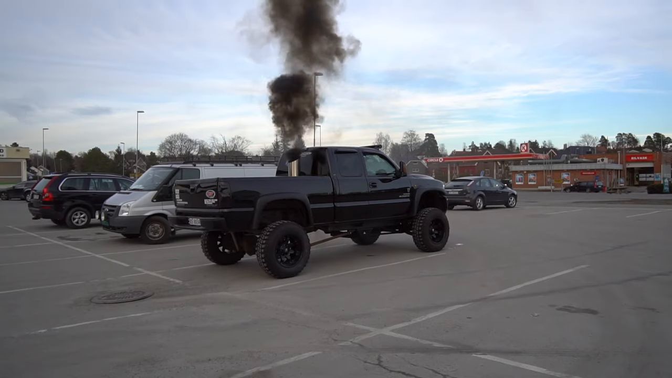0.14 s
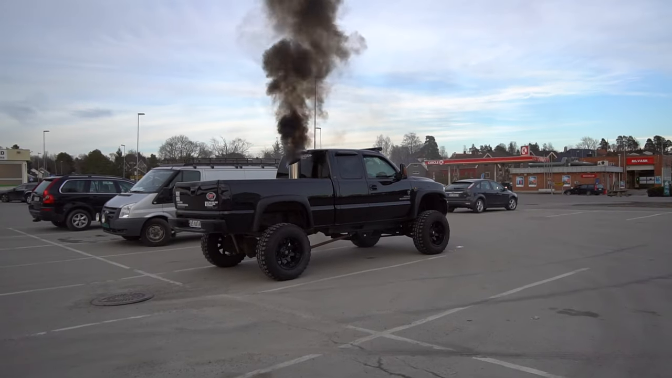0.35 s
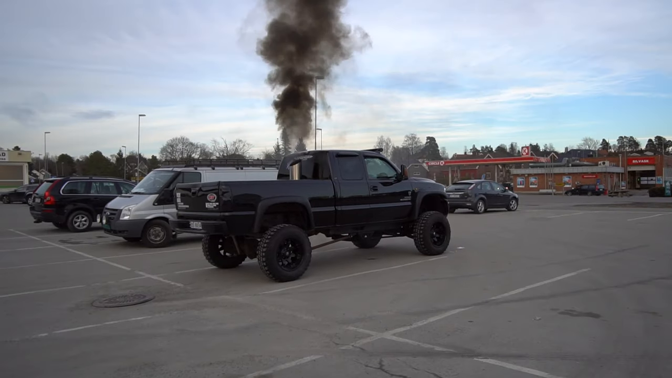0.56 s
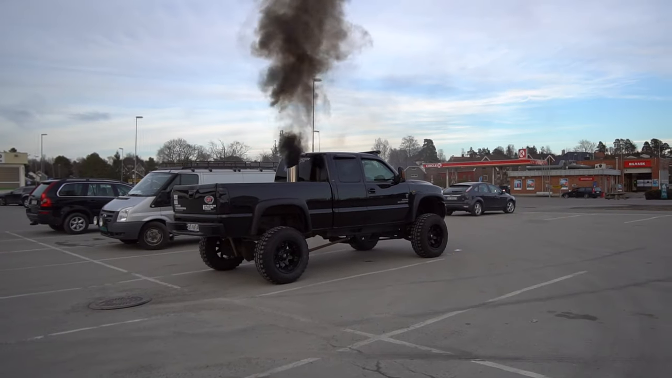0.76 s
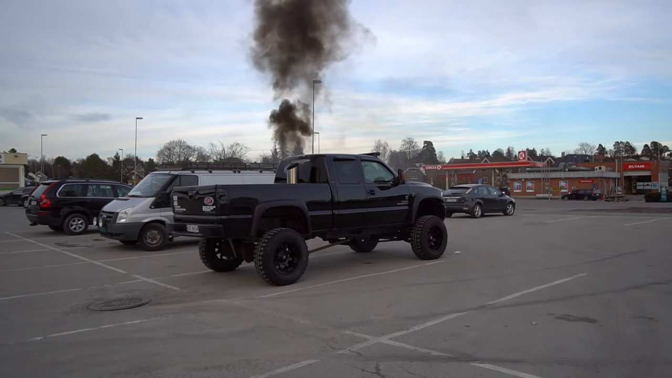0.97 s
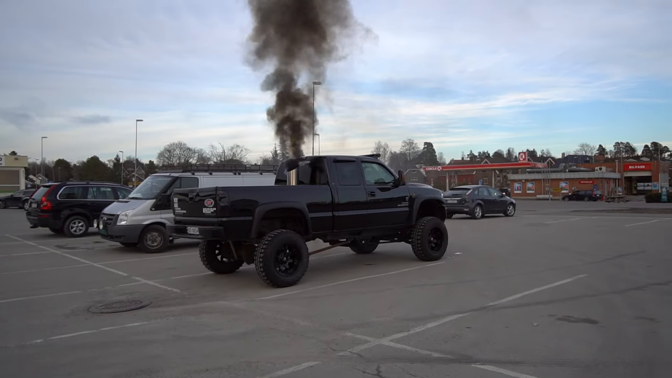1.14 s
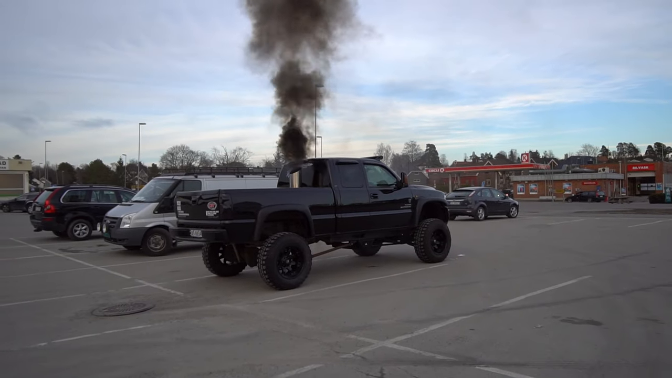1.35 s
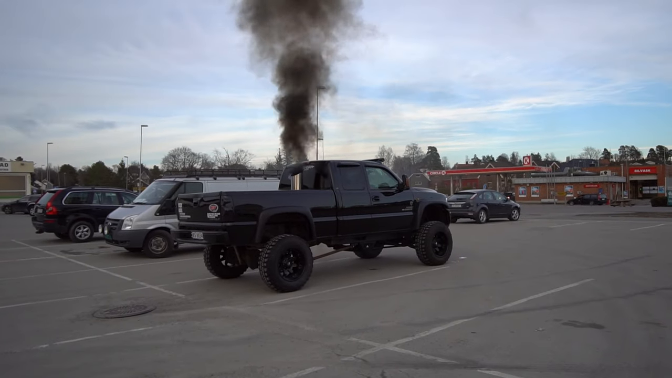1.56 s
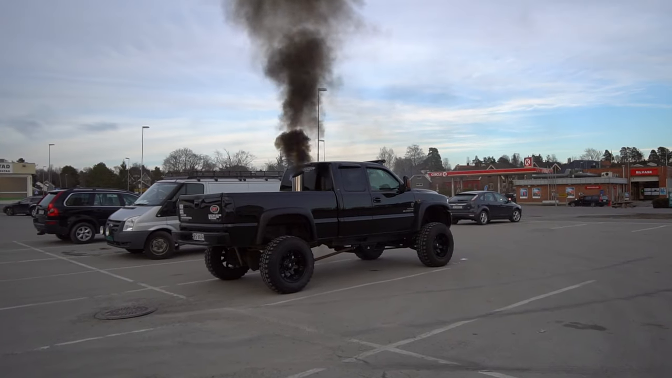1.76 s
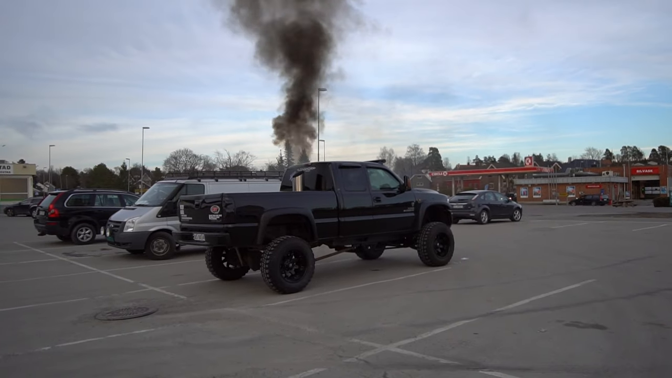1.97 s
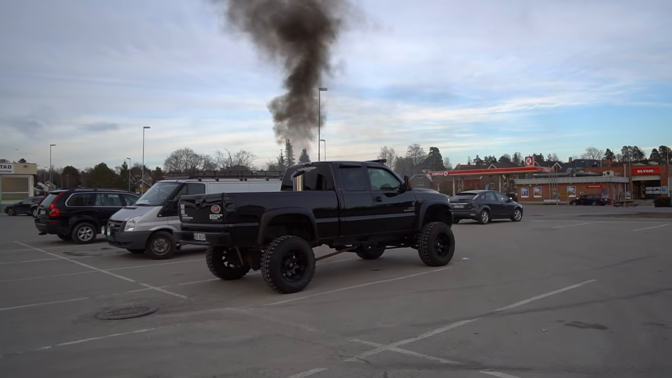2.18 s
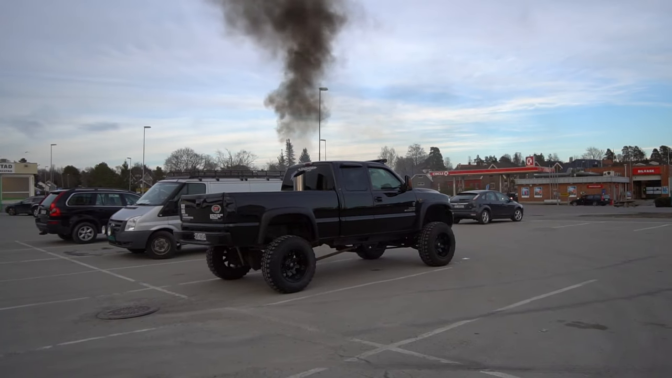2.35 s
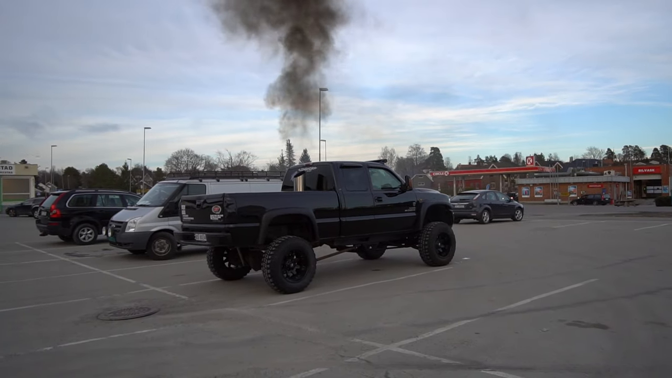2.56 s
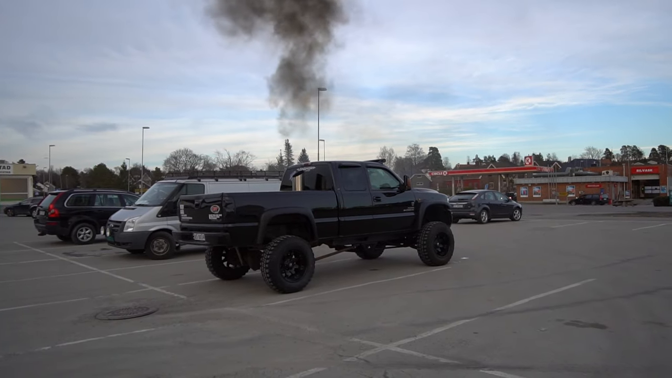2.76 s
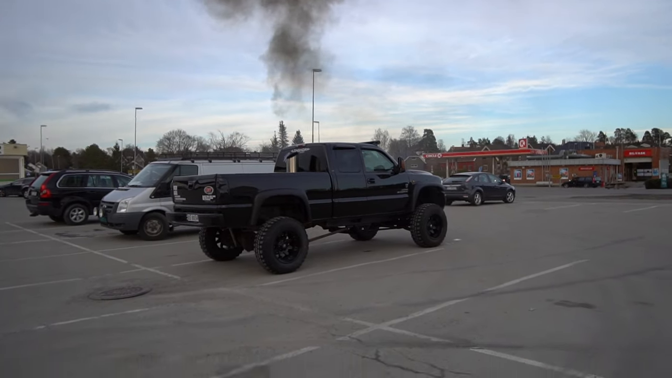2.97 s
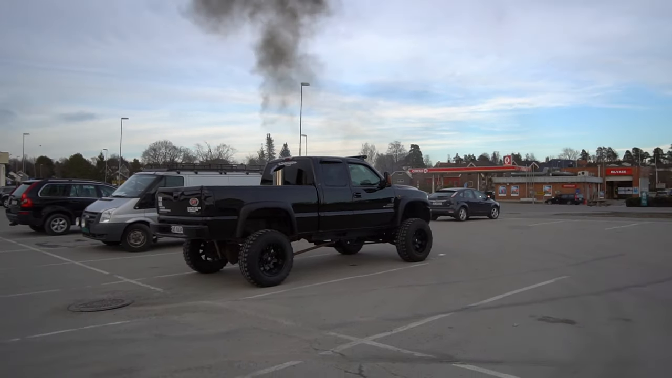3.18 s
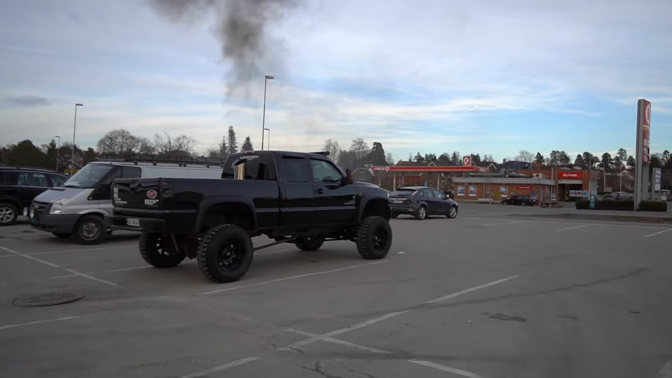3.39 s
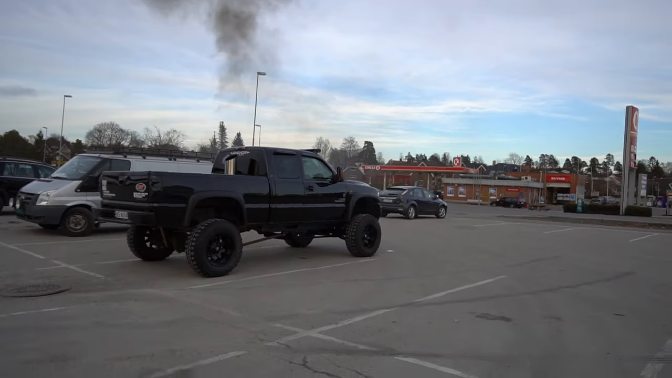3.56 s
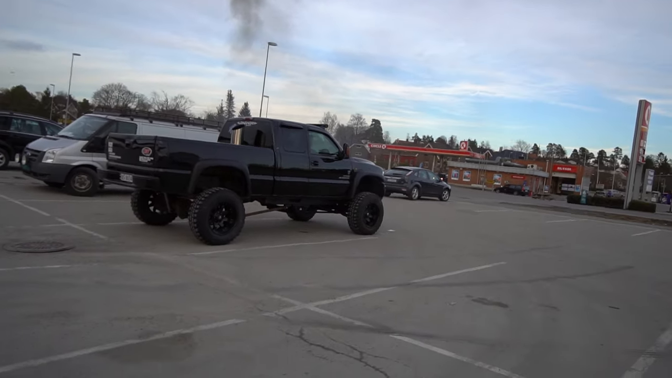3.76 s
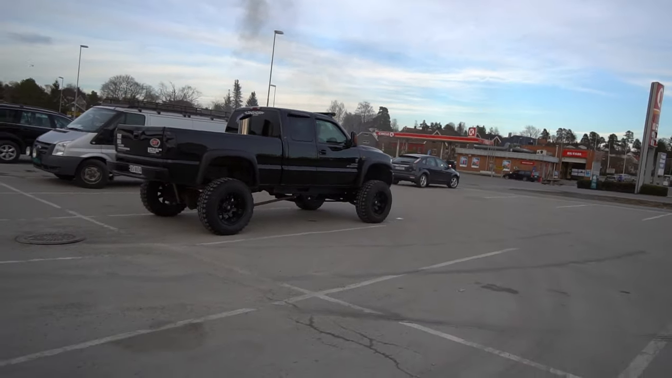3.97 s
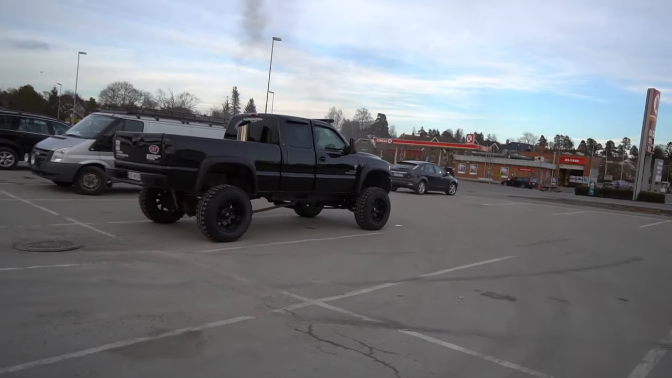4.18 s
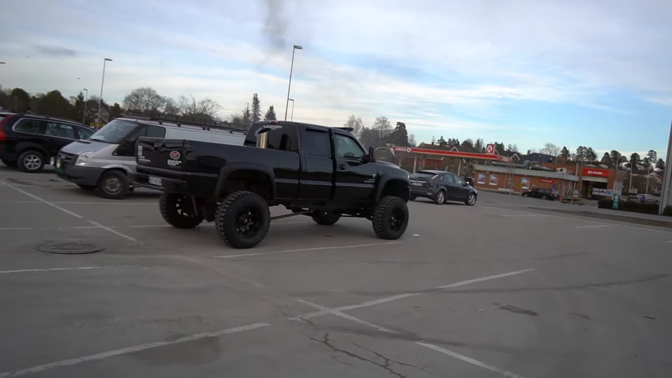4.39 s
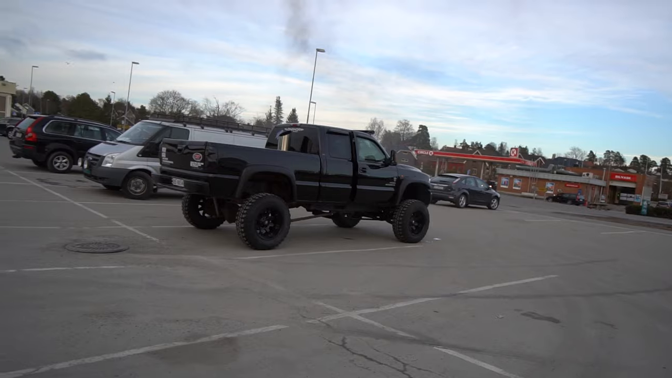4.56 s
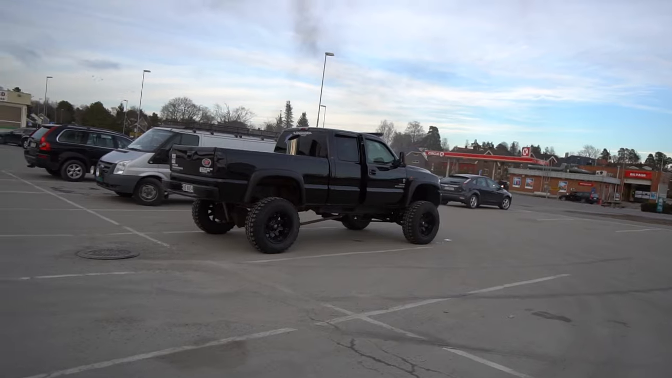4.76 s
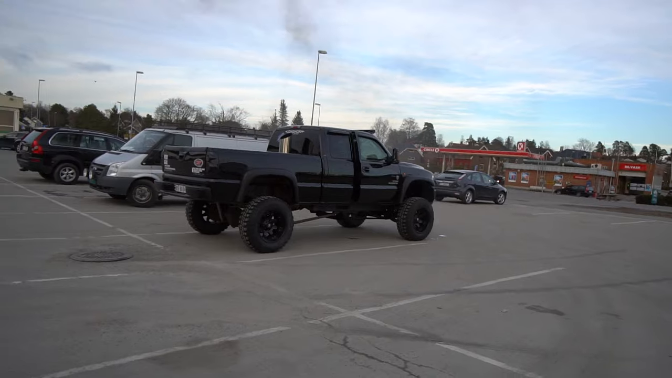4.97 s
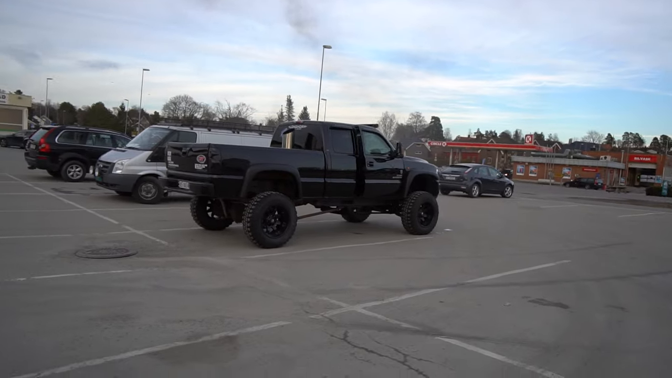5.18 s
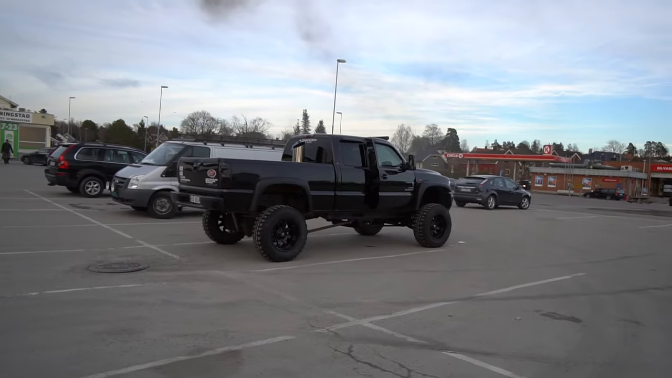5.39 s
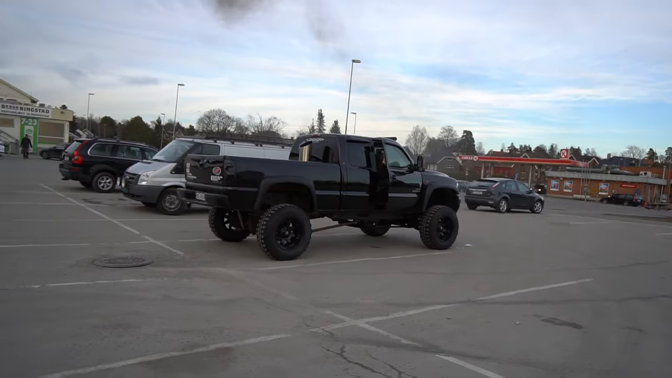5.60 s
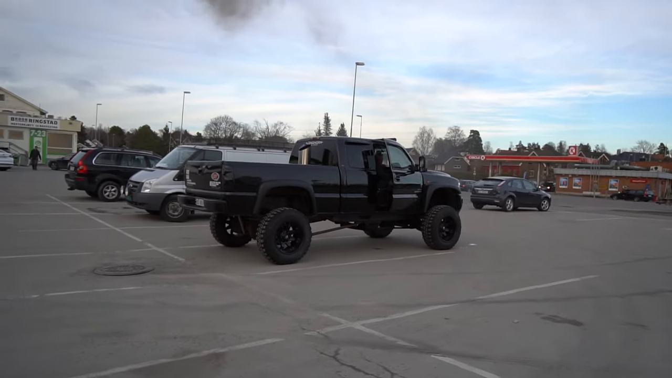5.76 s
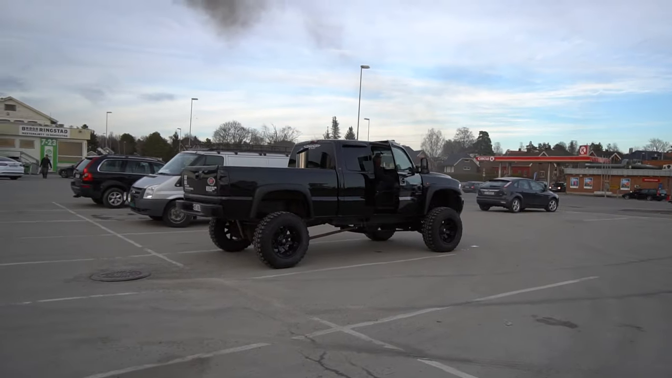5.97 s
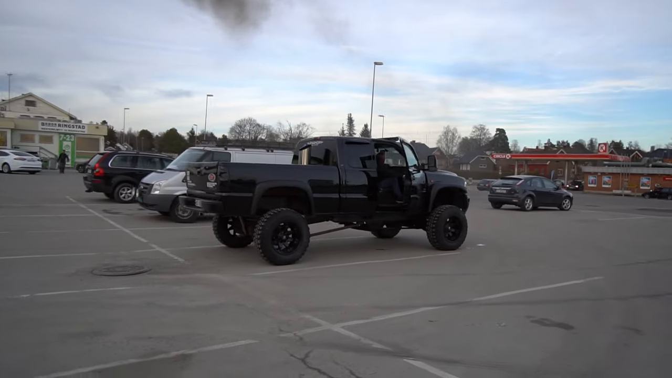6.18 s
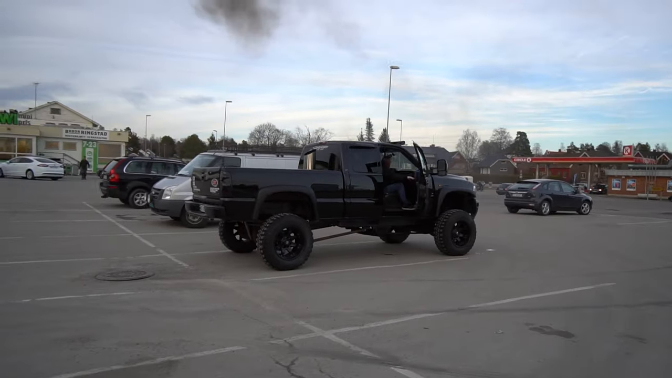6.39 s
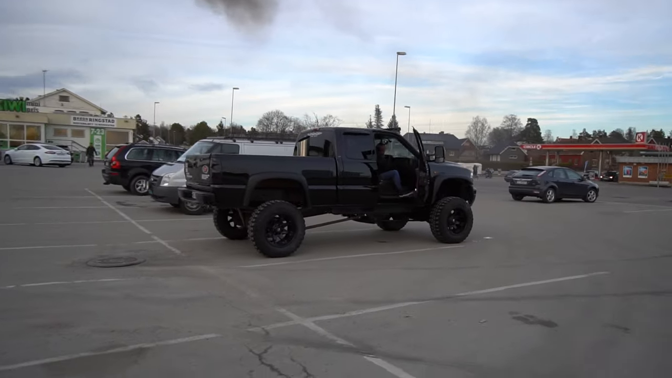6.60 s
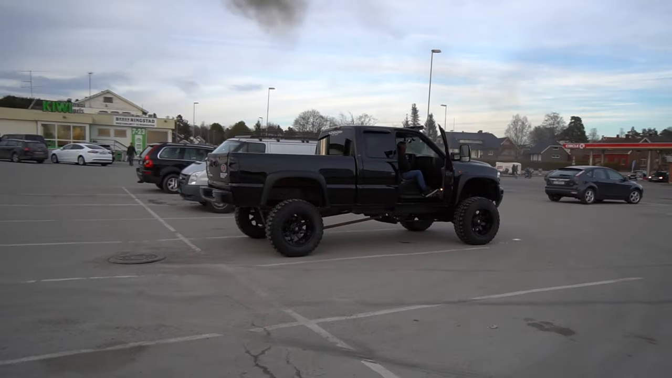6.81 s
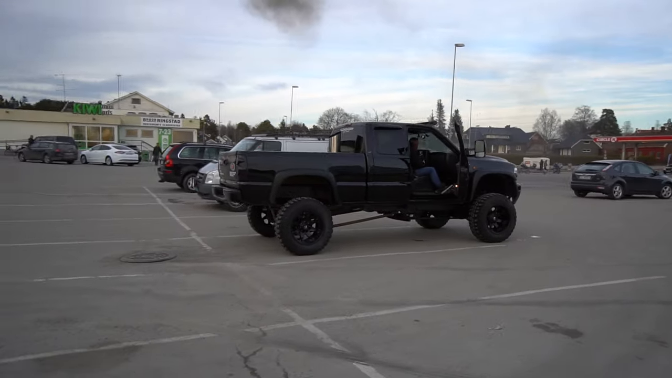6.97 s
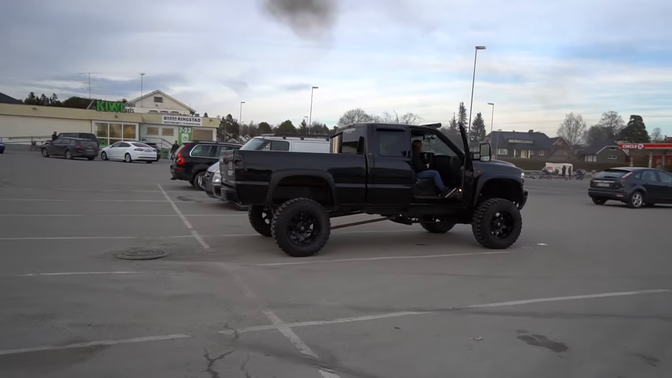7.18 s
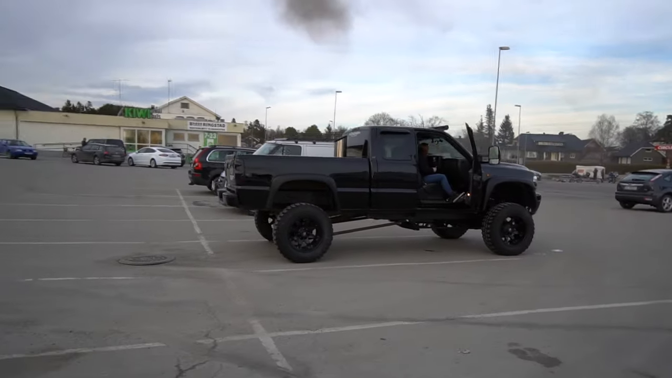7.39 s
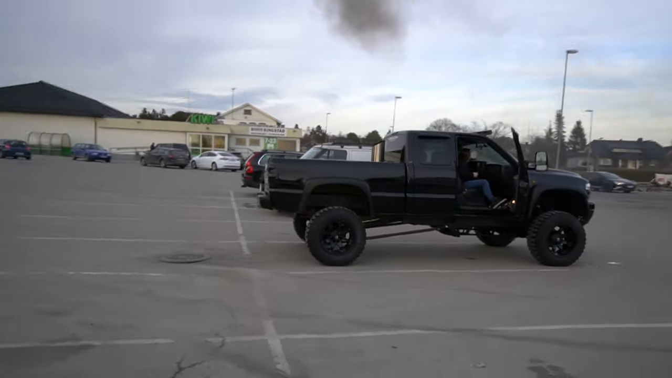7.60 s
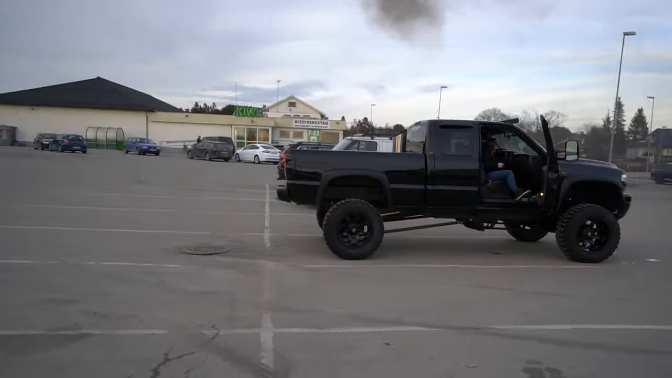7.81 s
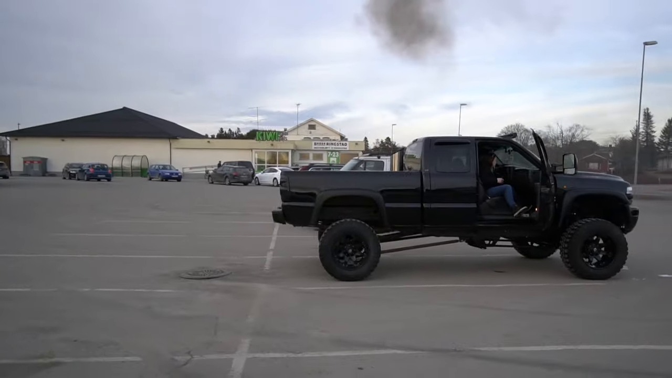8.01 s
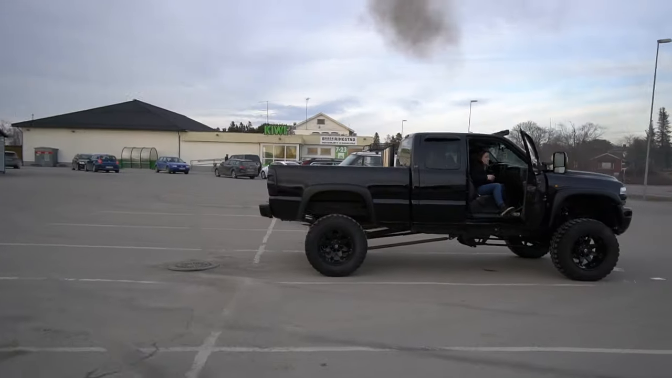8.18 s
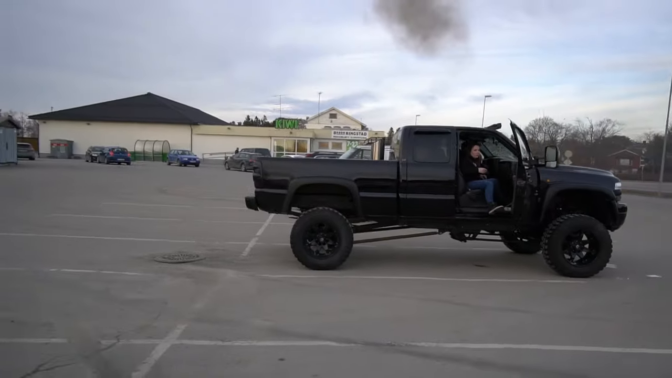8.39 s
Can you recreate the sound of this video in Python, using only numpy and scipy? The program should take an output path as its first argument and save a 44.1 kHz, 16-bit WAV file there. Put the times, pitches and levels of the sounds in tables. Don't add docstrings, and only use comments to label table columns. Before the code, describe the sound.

Four harsh diesel revs echo across a car park, run down with a thin gliding whistle, then a booming uneven idle knocks and grows closer.

```python
import sys
import numpy as np
from scipy import signal
from scipy.io import wavfile
from scipy.ndimage import uniform_filter1d

SR = 44100
rng = np.random.default_rng(int(sys.argv[2]) if len(sys.argv) > 2 else 0)


def dump(signal):
    limited = np.clip(np.atleast_2d(signal).T, -1, 1)
    pcm = np.round(limited * 32767).astype(np.int16)
    wavfile.write(sys.argv[1], SR, pcm)


def volts_from_db(level):
    exponent = np.asarray(level, float) / 20
    return 10 ** exponent


N = 372644
T = np.arange(N) / SR

# pedal_down_s, fuel_cut_s, speed_falls_s
PEDAL_STABS = [
    (.045, .165, .21),
    (.596, .678, .685),
    (1.034, 1.185, 1.235),
    (1.506, 1.605, 1.662),
]
# sharpness_0_to_1, pull_db, bark_db, knock_db, coast_after_db
STAB_EFFORT = [
    (0.93, 0, 0, -1.0, 1.5),
    (1, -2, -0.5, -2.5, -0.5),
    (0.99, 0, 2, -1.5, -0.5),
    (0.73, 1, 1.5, 1.5, -2.5),
]
# since_fall_s, order_3_db, order_4_db, other_orders_db, bark_db
COAST_DOWN = [
    (0, -14.5, -17.5, -15, -20.5),
    (.07, -17.5, -33, -18.5, -22.5),
    (.3, -18, -28, -21.5, -23),
    (.8, -19, -27, -26.5, -27.5),
    (1.05, -27, -29.5, -31.5, -29),
    (1.4, -39, -26, -26, -32.5),
    (1.7, -55, -37, -21, -36.5),
    (1.95, -42, -51, -41, -40.5),
]
# time_s, peak_db
FIRST_BLOWS = [
    (0.049, 5.5),
    (0.594, 1.5),
    (1.037, 2),
    (1.509, 6),
]
# time_s, boom_db, bark_db, boom_in_lull_after_db
IDLE_SURGES = [(3.58, -45, -33, -31), (3.79, -41, -41, -33), (4.016, -13, -33.5, -46),
               (4.273, -12, -34.5, -39), (4.579, -12.5, -35, -36), (4.834, -14, -35.5, -31),
               (5.129, -13.5, -35.5, -37), (5.423, -10.5, -34, -34), (5.696, -9.5, -34, -41),
               (5.958, -10, -32.5, -34), (6.254, -11.5, -34.5, -33), (6.511, -14.5, -31.5, -28.5),
               (6.813, -15, -30, -38), (7.099, -12.5, -28.5, -33), (7.378, -10, -28.5, -28),
               (7.649, -9.5, -27, -52), (7.938, -8.5, -26.5, -33), (8.213, -15, -25, -26),
               (8.419, -27, -37.5, -30)]
# share_0_to_1, boom_0_to_1, bark_0_to_1, knock_0_to_1, crank_turns_per_s
SURGE_COURSE = [
    (0, 0.85, 1, 0.8, 14.6),
    (.1, 0.69, 0.92, 0.53, 15.8),
    (.22, 0.57, 0.045, 0.34, 15),
    (.45, 0.16, 0.018, 0.09, 12.8),
    (.65, .02, 0.0091, 0.38, 11.8),
    (.82, .4, 0.64, .65, 12.2),
    (.93, 0.79, .85, 0.69, 13.5),
    (1, 0.96, 1, 1, 14.6),
]
# multiple_of_crank_speed, level_db
ENGINE_ORDERS = [(0.5, -44), (1, -18), (1.5, -5), (2, -1.5), (2.5, -4.5), (3, 0), (3.5, -22), (4, -10),
                 (4.5, -13.5), (5, -15.5), (5.5, -32), (6, -14), (6.5, -26), (7, -13.5), (7.5, -32.5),
                 (8, -18), (8.5, -22), (9, -12), (9.5, -30.5), (10, -20.5), (11, -27), (12, -25.5)]
CYLINDER_STRENGTH = [0, -9, -5, -10, -1, -8, -6, -10]
# pitch_hz, level_db
PIPE_RESPONSE = [(20, -27), (40, -43), (70, -13.5), (110, -5), (160, -6.5), (190, -2), (240, 0), (500, -4)]
# pitch_hz, width_hz, level_db
HOT_STACK = [(312, 72, 7), (403, 132, 6), (570, 420, -4.5), (1022, 140, -0.5), (1500, 144, -2.5),
             (2090, 210, -10)]
# pitch_hz, width_hz, level_db
COASTING_STACK = [(331, 18.5, 4.5), (420.7, 29.5, 0.5), (620, 240, -10.5), (1050, 200, -10.5),
                  (1453, 17, -16), (1960, 230, -27), (215, 155, -12)]
# pitch_hz, width_hz, level_db
IDLING_STACK = [(320, 25.5, 10.5), (411, 42.8, 7.5), (598, 95, 1), (862, 100, -2), (1200, 170, -13.5)]
# pitch_hz, width_hz, level_db
ENGINE_BLOCK = [(1007, 172, 2), (1460, 347, 4), (2066, 450, -1), (2436, 484, 0), (3420, 680, -7.5),
                (4204, 510, -14.5)]
# time_s, peak_db
LONE_KNOCKS = [(3.6942, -28), (3.7506, -29), (3.905, -27), (4.172, -41), (4.5019, -27), (4.828, -27),
               (5.1135, -31), (5.4128, -26), (5.5786, -27), (5.6518, -32), (5.7042, -49), (5.8967, -27.5),
               (6.007, -37), (6.5026, -24), (6.7498, -28), (6.806, -23), (6.9927, -30), (7.5485, -22),
               (7.8586, -23), (7.976, -64), (8.1414, -39), (8.426, -42)]
# pitch_hz, level_db_per_hz
AIR_RUSH = [(2350, -9.5), (4000, 0.5), (5340, -8.5), (6160, -6.5), (9930, -16.5), (10700, -8), (13700, -21),
            (15600, -9)]
# offset_s, level_db
VALVE_SPITS = [
    (0.001, -0.5),
    (.045, 2.5),
    (.102, -5.5),
]
# time_s, pitch_hz, level_db
TURBINE_WHISTLES = [
    [(2.05, 11000, -90), (2.3, 9300, -68), (2.55, 8500, -74), (2.75, 7500, -72), (3.1, 6280, -63),
     (3.3, 5750, -78), (3.5, 5270, -98)],
    [(1.95, 7350, -100), (2.2, 6500, -69), (2.4, 5870, -62), (2.65, 5400, -96.5)],
]
# delay_s, level_db
RETURNS = [
    (.0019, -6.5),
    (0.047, -7.5),
    (.093, -26),
    (0.161, -17),
]
# time_s, gain_db
WALK = [
    (4.15, 0.5),
    (5.67, 2),
    (6.6, 4.5),
    (7.45, 5.5),
    (8.06, 7.5),
    (8.45, 5.5),
]
# pitch_hz, level_db_per_hz
CAR_PARK = [(76, -6), (130, -2), (157, -20), (240, -19), (337, -15.5), (700, -29.5), (1360, -26.5),
            (3250, -37)]
# pitch_hz, level_db_per_hz
BASS_RUMBLE = [(30, -12), (36, 3.5), (50, -6.5), (90, 5), (130, -13.5)]
# start_s, end_s, pitch_hz, level_db
HUMS = [
    (0, 5.3, 48, -37),
    (4.8, 8.45, 74, -35),
    (7.24, 7.4, 228, -33),
    (3.72, 3.9, 108, -21),
]

SPIN_LEAD_S = 0.022
BARK_HIT_S, BARK_EDGE_S = 0.005, 0.015


def crank_speed():
    start_hz, governed_hz, stall_hz = 47.5, 56.84, 12.3
    spin_up_s, drag_per_s, friction_hz = 0.065, 0.285, 45.53
    speed = (start_hz + friction_hz) * np.exp(-drag_per_s * T) - friction_hz
    for down, cut, lift in PEDAL_STABS:
        i = int(max(down - SPIN_LEAD_S, 0) * SR)
        k = int(lift * SR)
        speed[i:] = governed_hz + (speed[i] - governed_hz) * np.exp(-(T[i:] - T[i]) / spin_up_s)
        speed[k:] = (speed[k] + friction_hz) * np.exp(-drag_per_s * (T[k:] - T[k])) - friction_hz
    return np.maximum(speed, stall_hz)


def pedal():
    fuel_third_db, fuel_fourth_db, fuel_other_db = -30, -16.5, -20.5
    fuel_bark_db, bark_sag_db_per_s = -12, 22
    coast_knock_db, knock_fall_db_per_s = -27, 9.5
    fuel_knock_db, knock_sag_db_per_s = -19.5, 35
    coast_rush_db, rush_fall_db_per_s, rush_choke_db = -41.5, 11.5, -9
    earlier_lift_s = -0.33
    fourth_rise_s, third_return_s = 0.06, 0.04
    choke_lag_s, choke_edge_s = 0.022, 0.012
    down, cut, lift = np.transpose(PEDAL_STABS)
    sharp, pull_db, rasp_db, hard_db, after_db = np.transpose(STAB_EFFORT)

    last = np.searchsorted(down + choke_lag_s, T)
    since = np.maximum(T - np.r_[earlier_lift_s, lift][last], 0)
    fall_db = np.r_[after_db[0], after_db][last]
    coming = np.minimum(np.searchsorted(lift + fourth_rise_s, T), len(down) - 1)
    held = np.maximum(T - down[coming], 0)

    coast_s, *levels = np.transpose(COAST_DOWN)
    third, fourth, other, bark_db = (np.interp(since, coast_s, level) + fall_db for level in levels)

    burning = sum(gate(a - BARK_HIT_S, 9, BARK_HIT_S) * gate(-1, b, 2 * BARK_EDGE_S)
                  for a, b in zip(down, cut))
    third_back = np.maximum(lift, cut + third_return_s) - third_return_s
    pulling = sum(gate(a - SPIN_LEAD_S, b, third_return_s) for a, b in zip(down, third_back))
    singing = sum(gate(a - BARK_EDGE_S, b - third_return_s / 2, fourth_rise_s)
                  for a, b in zip(down, lift))
    choked = sum(gate(a + choke_lag_s, b, choke_edge_s) for a, b in zip(down, cut))
    pilot_db = 5 * sum(np.clip((T - a) / 0.15 + 1, 0, 1) * (T < a + choke_lag_s) for a in down)
    jolt_db = 14 * 0.77 * sum(np.exp(-((T - a) / 0.019) ** 2) for a in down)
    flutter_db = 2.0 * np.exp(-since / 0.62)

    third_db = third + pulling * (fuel_third_db - third) + 0.6 * drift(11)
    fourth_db = fourth + singing * (fuel_fourth_db + pull_db[coming] - fourth) + 0.6 * drift(5.5)
    other_db = other + choked * (fuel_other_db - other) + jolt_db
    fuelled_bark = fuel_bark_db + rasp_db[coming] - bark_sag_db_per_s * held
    bark_db = bark_db + burning * (fuelled_bark - bark_db) + flutter_db * drift(7)
    knock = coast_knock_db + fall_db - knock_fall_db_per_s * since + pilot_db
    fuelled_knock = fuel_knock_db + hard_db[coming] - knock_sag_db_per_s * held
    knock_db = knock + burning * (fuelled_knock - knock) + flutter_db * drift(25)
    rush_db = coast_rush_db + 0.57 * fall_db - rush_fall_db_per_s * since
    rush_db = rush_db + 0.85 * pilot_db + rush_choke_db * choked
    return third_db, fourth_db, other_db, bark_db, knock_db, rush_db


def surges():
    start, top_db, bark_db, lull_db = np.transpose(np.array(IDLE_SURGES, float))
    number = np.arange(len(start))
    count = np.interp(T, start, number, right=len(start) - 0.9)
    share, *courses = np.transpose(SURGE_COURSE)
    boom, bark_rise, knock, speed = (np.interp(count % 1, share, course) for course in courses)
    top = np.interp(T, start, top_db)
    lull = np.interp(count - 0.55, number, lull_db)
    boom_db = lull + (top - lull) * boom
    idle_bark_db = np.interp(T, start, bark_db) - 16 * (1 - bark_rise)
    idle_knock_db = -36.5 - 14.9 * (1 - knock)
    return boom_db, idle_bark_db, idle_knock_db, knock, speed


def firings(turns, spread_db, jitter_s):
    at = np.flatnonzero(np.diff(np.floor(4 * turns)))
    chance = rng.standard_normal((len(at), 2))
    late = np.clip(at + (jitter_s * SR * chance[:, 0]).astype(int), 0, N - 1)
    cylinder_db = np.array(CYLINDER_STRENGTH)[np.arange(len(at)) % 8]
    clicks = np.zeros(N) + 1e-18
    clicks[late] = volts_from_db(cylinder_db + spread_db * chance[:, 1])
    return clicks


def exhaust_tones(turns, speed, third_db, fourth_db, other_db):
    out = volts_from_db(third_db) * np.sin(6 * np.pi * turns) + volts_from_db(fourth_db) * np.sin(8 * np.pi * turns)
    for order, db in ENGINE_ORDERS:
        if order not in (3, 4):
            pipe_db = at_hz(PIPE_RESPONSE, order * speed)
            gain = volts_from_db(other_db + db + 2.5 + pipe_db + 2.2 * drift(13.0))
            out += gain * np.sin(2 * np.pi * (order * turns + rng.random()))
    return np.sqrt(2) * out


def bark(clicks, fuel, hot, cool, rough):
    flow = puffs(clicks, 0.00092, 1.0)
    blows = even(resonate(clicks + rough * flow * np.std(clicks), hot), 0.04)
    breath = even(resonate(flow, cool), 0.021)
    return np.sqrt(fuel) * blows + np.sqrt(1 - fuel) * breath


def pops():
    start, peak_db = np.transpose(FIRST_BLOWS)
    clicks = np.zeros(N) + 1e-18
    clicks[[round(s * SR) for s in start]] = volts_from_db(peak_db)
    blow = resonate(clicks, [(376, 170, -3.0), (1040, 420, -21), (114, 150, 0.0)])
    return volts_from_db(-1.5) * blow * volts_from_db(np.max(peak_db)) / np.max(np.abs(blow))


def boom(clicks, turns):
    ring = even(resonate(resonate(clicks, [(111, 9, 0)]), [(112, 40, 0)]), 0.0388)
    thud = volts_from_db(-5.5) * np.sin(8 * np.pi * turns)
    upper = volts_from_db(-18.5) * even(resonate(clicks, [(173.0, 75, 0)]), 0.014)
    return ring + thud + upper


def block_knock(clicks):
    return even(resonate(puffs(clicks, 0.005, 0.9), ENGINE_BLOCK), 0.08)


def raps():
    start, peak_db = np.transpose(LONE_KNOCKS)
    clicks = np.zeros(N) + 1e-18
    clicks[[round(s * SR) for s in start]] = volts_from_db(peak_db - 14.5)
    ring = rms_one(resonate(rng.standard_normal(N), [(2440, 190, 5.5), (4220, 480, -9.5)]))
    return flares(clicks, 0.0076) * ring


def air_rush(rush_db):
    return (volts_from_db(-75) + volts_from_db(rush_db)) * coloured(AIR_RUSH, patchy_db=0.9)


def ticks(near_db):
    cam_start_s, cam_turn_s = 3.7561, 0.1518
    turn = np.arange(cam_start_s, N / SR - cam_turn_s / 2, cam_turn_s)[:, None]
    offset, db = np.transpose(VALVE_SPITS)
    chance = rng.standard_normal((2, len(turn), len(offset)))
    at = np.minimum(((turn + offset + 0.004 * chance[0]) * SR).astype(int), N - 1)
    clicks = np.zeros(N) + 1e-18
    clicks[at] = volts_from_db(-79 + db + 2.8 * near_db[at] + 1.2 * chance[1])
    air = rms_one(resonate(rng.standard_normal(N), [(8000, 3000, -2), (12600, 6000, 15)]))
    return flares(clicks, 0.008) * air


def whistle(rows):
    hz, db = in_time(rows)
    turns = np.cumsum(hz * (1 + 0.0049 * drift(40))) / SR
    return volts_from_db(db + 1.5 * drift(30)) * np.sin(2 * np.pi * turns)


def echoes(x):
    dull = signal.lfilter([0.3], [1, -0.7], x)
    return x + sum(volts_from_db(db) * np.pad(dull, (int(s * SR), 0))[:N] for s, db in RETURNS)


def drone(on, off, hz, db):
    turns = np.cumsum(hz * (1 + 0.0152 * drift(3.5))) / SR
    return volts_from_db(db + 0.73 * drift(8.3)) * gate(on, off, 0.019) * np.sin(2 * np.pi * turns)


def car_park(near_db, flow_gain):
    yard = volts_from_db(-33.5 + near_db) * coloured(CAR_PARK, patchy_db=-2.0)
    hums = sum(drone(*row) for row in HUMS)
    rumble = (volts_from_db(-33) + flow_gain) * coloured(BASS_RUMBLE, patchy_db=3.0)
    return yard + hums + rumble


def puffs(clicks, decay_s, steady):
    return rng.standard_normal(N) * (even(flares(clicks, decay_s), 0.024) + steady)


def flares(clicks, decay_s):
    r = np.exp(-1 / (decay_s * SR))
    return signal.lfilter([np.e * (1 - r)], [1, -2 * r, r * r], clicks)


def resonate(x, modes):
    out = 0
    for k, (hz, width, db) in enumerate(modes):
        r = np.exp(-np.pi * width / SR)
        b = (1 - r * r) / 2 * np.array([1, 0, -1])
        a = [1, -2 * r * np.cos(2 * np.pi * hz / SR), r * r]
        out = out + (-1) ** k * volts_from_db(db) * signal.lfilter(b, a, x)
    return out


def coloured(spectrum, patchy_db):
    white, out = rng.standard_normal((2, N)), 0
    edges = np.geomspace(spectrum[0][0], spectrum[-1][0], 11)
    for k, (low, high) in enumerate(zip(edges, edges[1:])):
        sos = signal.butter(2, [low, high], "band", fs=SR, output="sos")
        band_db = at_hz(spectrum, np.sqrt(low * high)) + patchy_db * drift(23.0)
        out = out + volts_from_db(band_db) * signal.sosfilt(sos, white[k % 2])
    return rms_one(out)


def dulled(x, top_hz):
    return signal.sosfilt(signal.butter(4, top_hz, fs=SR, output="sos"), x)


def drift(rate):
    r = np.exp(-80 * np.pi * rate / SR)
    slow = signal.lfilter([1], [1, -2 * r, r * r], rng.standard_normal(N // 40 + 2002))[2000:]
    return np.interp(np.arange(N) / 40, np.arange(len(slow)), rms_one(slow))


def gate(on, off, soft):
    return np.clip((T - on) / soft, 0, 1) * np.clip((off - T) / soft + 1, 0, 1)


def even(x, span):
    return x / np.sqrt(uniform_filter1d(x ** 2, int(span * SR)) + 1e-12)


def rms_one(x):
    return x / np.sqrt(np.mean(x ** 2) + 1e-20)


def in_time(rows):
    s, *columns = np.transpose(rows)
    return [np.interp(T, s, column) for column in columns]


def at_hz(points, hz):
    table_hz, db = np.transpose(points)
    return np.interp(np.log(hz), np.log(table_hz), db)


def scene():
    third_db, fourth_db, other_db, bark_db, knock_db, rush_db = pedal()
    boom_db, idle_bark_db, idle_knock_db, surge, idle_speed = surges()
    near_db = in_time(WALK)[0]
    idle = gate(3.64, 9, 0.1)
    rev_speed = crank_speed()
    speed = rev_speed + idle * (idle_speed - rev_speed)
    turns = np.cumsum(speed) / SR
    fuel = sum(np.clip(effort[0], 0, 1) * gate(down - BARK_HIT_S, cut, BARK_EDGE_S)
               for (down, cut, lift), effort in zip(PEDAL_STABS, STAB_EFFORT))

    tones = exhaust_tones(turns, speed, third_db, fourth_db, other_db)
    tones += fuel * volts_from_db(bark_db - 10) * np.sin(2 * np.pi * 8 * turns)
    fast = firings(turns, spread_db=3.5, jitter_s=0.0001)
    slow = firings(turns, spread_db=2, jitter_s=0.0006)
    load, idle_load = 0.35 + 0.6 * fuel, 0.7 * surge ** 2
    revving = volts_from_db(bark_db - 2.0) * bark(fast, load, HOT_STACK, COASTING_STACK, rough=0.32)
    idling = bark(slow, idle_load, IDLING_STACK, IDLING_STACK, rough=0.6)
    idling *= volts_from_db(idle_bark_db - 1.5)
    rev_sound = tones + echoes(revving + pops())
    idle_sound = volts_from_db(boom_db) * boom(slow, turns) + echoes(idling)
    truck = (1 - idle) * rev_sound + idle * idle_sound

    near_knock_db = idle_knock_db + 0.76 * near_db
    knock = block_knock(slow) * volts_from_db(knock_db + idle * (near_knock_db - knock_db))
    idle_rush_db = -72 + 2.1 * near_db + 6.7 * surge
    rush = air_rush(rush_db + idle * (idle_rush_db - rush_db)) + ticks(near_db)
    whistles = sum(map(whistle, TURBINE_WHISTLES))
    background = car_park(near_db, (1 - idle) * volts_from_db(other_db - 36))
    engine = dulled(truck, 3300) + dulled(knock, 6400) + raps() + rush + whistles
    return (engine + background)[None]


def roll_off(x):
    return signal.sosfilt(signal.butter(12, 15700, fs=SR, output="sos"), x)


def record(dry):
    thin = signal.sosfilt(signal.butter(2, 30, "high", fs=SR, output="sos"), dry)
    rounded = thin / (1 + (thin / 1.1) ** 4) ** 0.25
    return roll_off(np.clip(rounded, -1, 1))


dry = scene()
out = record(dry)
dump(out)
```